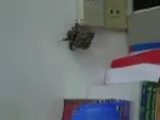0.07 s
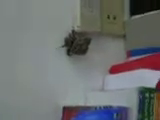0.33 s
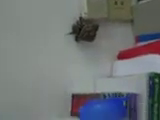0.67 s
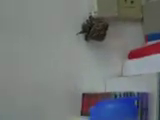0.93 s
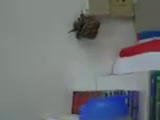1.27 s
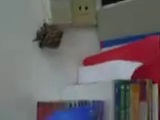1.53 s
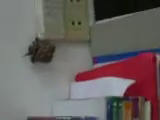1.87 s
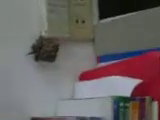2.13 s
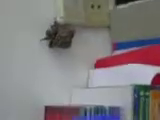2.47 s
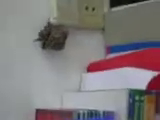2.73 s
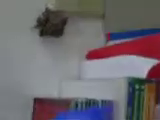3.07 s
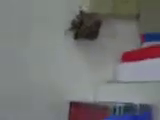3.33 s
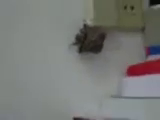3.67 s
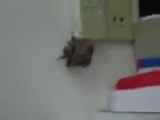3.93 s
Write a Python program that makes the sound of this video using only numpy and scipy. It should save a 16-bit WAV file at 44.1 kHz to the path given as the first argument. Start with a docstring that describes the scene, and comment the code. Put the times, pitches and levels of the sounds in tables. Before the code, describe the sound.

Faint, dry scratches and ticks from a small crab's legs on a wall come in quick bursts over a steady room hum. Soft rubbing and hollow knocks join in; one sharp knock overloads the dull microphone, then the scratching stops.

```python
"""A quiet room hums throughout. Almost at once small, dry, scratchy bursts begin, each a fine rasp with
two or three ticks, perhaps a small camera's focus motor. Soft rubbing and a few hollow knocks,
probably a hand on the camera body, join in. From 1 s the bursts come about seven times a second.
Just after 3 s one knock overloads the dull microphone; the bursts stop and faint rubbing follows."""
import sys
import numpy as np
from scipy import signal
from scipy.fft import rfft, irfft
from scipy.io import wavfile

SR = 44100
rng = np.random.default_rng(int(sys.argv[2]) if len(sys.argv) > 2 else 0)


def unload_audio(sound):
    """Save the sound as a 16-bit wav file, at the path given as the first command line argument."""
    columns = np.transpose(np.atleast_2d(sound))
    # keep every value between -1 and 1, then stretch to whole-number steps
    steps = np.round(np.clip(columns, -1, 1) * 32767)
    wavfile.write(sys.argv[1], SR, steps.astype(np.int16))


N = 176400


def amp(db):
    """Amplitude ratio of a level in decibels."""
    return 10 ** (np.asarray(db) / 20)


def unit(x):
    """Normalisation to rms 1."""
    return x / np.sqrt(np.mean(x ** 2) + 1e-20)


def add(mix, start_s, sound):
    """Superposition: a sound adds to the mix from its onset."""
    part = mix[max(round(start_s * SR), 0):][:len(sound)]
    part += sound[:len(part)]


def colour(x, spectrum):
    """Spectral shaping by a curve of (f/Hz, level/dB) points, at rms 1."""
    hz, db = np.transpose(spectrum)
    f = np.fft.rfftfreq(N, 1 / SR)
    gain = amp(np.interp(np.log(f + 1), np.log(hz + 1), db))
    return unit(irfft(rfft(x) * gain, N))


def ring(modes, rise_s, swell=2):
    """Free vibration: damped modes (f/Hz, level/dB, T60/s) sum under a soft onset."""
    t = np.arange(SR // 10) / SR
    body = sum(amp(db - 60 * t / t60) * np.sin(2 * np.pi * hz * t) for hz, db, t60 in modes)
    return body * (1 - np.exp(-(t / rise_s) ** swell))


def grain_noise(spans, spectrum, edge_s, grains_per_s):
    """Shot noise: tiny random impulses merge into a hiss while a span lasts."""
    t = np.arange(N) / SR
    grains = rng.standard_normal(N) * (rng.random(N) < grains_per_s / SR)
    envelope = np.zeros(N)
    for start, length, db in spans:
        inside_s = np.minimum(t - start, start + length - t)
        envelope += amp(db) * np.clip(inside_s / edge_s + .5, 0, 1)
    return envelope * colour(grains, spectrum)


def low_pass(x, hz):
    """Band limiting by a steep linear-phase filter."""
    return signal.fftconvolve(x, signal.firwin(401, hz, window=("kaiser", 9), fs=SR), "same")


# Spectral density of the room noise: f/Hz, relative level/dB
ROOM_SPECTRUM = [(20, -2.5), (60, -1.5), (90, -7.5), (130, -1.5), (200, -.5), (380, -3), (500, -1),
                 (700, -4.5), (1000, -7.5), (1300, -12.5), (2000, -13.5), (3000, -14.5), (3700, -20.5),
                 (4000, -29.5), (4300, -35)]
def room_noise():
    """Stationary Gaussian noise, strongest at low frequencies."""
    return amp(-41) * colour(rng.standard_normal(N), ROOM_SPECTRUM)


# Tones of the hum: f/Hz, rms level/dB
HUM_TONES = [(100, -66), (161, -68), (269.2, -56.5)]
def hum(depth=0.18, waver_hz=2):
    """Amplitude modulation by slow noise makes each steady tone waver."""
    t, f = np.arange(N) / SR, np.fft.rfftfreq(N, 1 / SR)
    slow_band = np.exp(-(f / waver_hz) ** 2)
    out = np.zeros(N)
    for hz, db in HUM_TONES:
        waver = unit(irfft(rfft(rng.standard_normal(N)) * slow_band, N))
        tone = np.sqrt(2) * np.sin(2 * np.pi * (hz * t + rng.random()))
        out += amp(db) * (1 + depth * waver) * tone
    return out


# Rubbing strokes: t/s, duration/s, level/dB
RUB_STROKES = [(.605, 0.184, -43), (.8, 0.17, -43), (3.31, 0.47, -48.5)]
# Spectrum of the rubbing: f/Hz, relative level/dB
RUB_SPECTRUM = [(80, -22), (180, -8.5), (350, -4.5), (600, -3), (900, 2.5), (1250, 0), (1700, 0),
                (2500, -6.5), (3400, -12), (4400, -32)]
def rubbing():
    """Sliding friction: dense tiny slips in long, gentle strokes give a soft mid-range noise."""
    return grain_noise(RUB_STROKES, RUB_SPECTRUM, edge_s=0.013, grains_per_s=3100)


# Blows on the case: t/s, level/dB, T60 factor, rise time/s, frequency factor
CASE_BLOWS = [(.1205, -31, 1.9, .0005, 1.26), (.8355, -26.5, 0.76, 0.00032, 0.95),
              (.9012, -20, 0.43, 0.00034, 1.87), (1.7185, -28.5, 0.95, .0003, 1.18),
              (2.0095, -24, 1.8, .002, .97), (2.2072, -18, 1.38, 0.00043, 1.07),
              (2.5838, -8, 0.13, .0006, 0.83), (2.857, -28.5, 1.3, 0.0007, 1.59),
              (2.9163, -26, 0.96, .0006, 1.53), (3.1395, -2.5, 0.9, .00033, 1.02),
              (3.3405, -25.5, 0.18, .0003, 1.03)]
# Modes of the case: f/Hz, relative level/dB, T60/s
CASE_MODES = [(377, -31.5, 0.098), (639, -2, 0.028), (766, -7, 0.027), (874, -6, 0.022),
              (1524, 11.5, 0.0025), (2550, -22.5, 0.01), (3750, -21.5, 0.0046)]
def knocks(rebound_s=.0073, rebound_db=-23):
    """Impact excitation: a damped hollow case rings, its pitch set by the spot, and one close echo follows."""
    out = np.zeros(N)
    for start, db, length, rise_s, pitch in CASE_BLOWS:
        modes = [(hz * pitch, level, t60 * length) for hz, level, t60 in CASE_MODES]
        blow = amp(db) * ring(modes, rise_s)
        add(out, start, blow)
        add(out, start + rebound_s, amp(rebound_db) * blow)
    return out


# Bursts of rasp: t/s, duration/s, level/dB
RASP_BURSTS = [(.113, 0.043, -45.5), (.251, 0.028, -44.5), (.45, 0.0038, -42.5), (1.055, 0.026, -46),
               (1.173, 0.044, -49), (1.314, .038, -49.5), (1.452, 0.017, -42), (1.578, 0.033, -44.5),
               (1.715, 0.035, -45), (1.852, 0.043, -44), (1.973, 0.057, -47.5), (2.114, 0.034, -46),
               (2.252, 0.024, -46), (2.315, 0.048, -49.5), (2.4, 0.023, -43.5), (2.45, .038, -44.5),
               (2.715, 0.034, -41), (2.772, 0.042, -45.5), (2.852, 0.016, -47.5), (2.913, .01, -58),
               (2.973, 0.0068, -42), (3.174, 0.012, -43), (3.335, 0.029, -43)]
# Spectrum of the rasp: f/Hz, relative level/dB
RASP_SPECTRUM = [(300, -31), (700, -2), (1000, -6), (1250, -7), (1700, -1.5), (2100, -16.5), (2300, -1.5),
                 (2720, -4), (2920, 1), (3120, -5), (3350, -3.5), (3750, -18.5), (4300, -25.5)]
def fine_rasp():
    """Gated shot noise: short bursts of fine, dry rasp under the ticks."""
    return grain_noise(RASP_BURSTS, RASP_SPECTRUM, edge_s=0.00085, grains_per_s=7000)


# Dry ticks: t/s, relative level/dB, f/Hz
TICKS = [(0.1146, -43, 1800), (0.1486, -32, 1740), (0.2518, -30, 1810), (0.2629, -36.5, 1720),
         (0.2848, -30, 1740), (0.835, -35, 1640), (0.9006, -41, 1580), (1.0571, -25, 1630),
         (1.076, -33, 1720), (1.0809, -27, 1820), (1.1762, -31, 1770), (1.208, -37, 1670),
         (1.3154, -22.5, 1616), (1.3354, -33, 1720), (1.3498, -30, 1690), (1.4538, -34, 1500),
         (1.484, -30, 1750), (1.584, -28, 1734), (1.5957, -30.5, 1670), (1.6132, -33, 1750),
         (1.717, -26, 1710), (1.749, -30.5, 1720), (1.8577, -28.5, 1780), (1.8684, -33, 1630),
         (1.8844, -28, 1660), (1.9748, -26, 1760), (2.1156, -21.5, 1645), (2.149, -28.5, 1780),
         (2.2527, -30.5, 1660), (2.2853, -32, 1824), (2.314, -33.5, 1670), (2.3493, -29, 1740),
         (2.408, -29.5, 1660), (2.4197, -33, 1700), (2.4523, -37, 1700), (2.4835, -27.5, 1740),
         (2.6505, -30.5, 1780), (2.7208, -27, 1640), (2.7366, -27.5, 1690), (2.7531, -29, 1730),
         (2.7736, -36, 1770), (2.7933, -28.5, 1680), (2.808, -32, 1680), (2.859, -31.5, 1660),
         (2.9171, -29.5, 1695), (2.9749, -30.5, 1750), (2.9797, -32.5, 1720), (3.1752, -29, 1730),
         (3.2078, -34, 1760), (3.314, -31, 1630), (3.3514, -29, 1780)]
# Modes of a tick: frequency ratio, relative level/dB, T60/s
TICK_MODES = [(.4, -19.5, .008), (.6, -14, 0.011), (.85, -13, .004), (1, 2.5, 0.0064), (1.3, -13.5, .004),
              (1.7, -14.5, 0.0071), (1.95, -18, 0.006)]
def dry_ticks(gain_db=18, detune=0.02, echo_s=.0029, echo_db=-8.5):
    """Damped resonance: small ticks in quick, regular groups each ring briefly, with one close echo."""
    out = np.zeros(N)
    for start, db, hz in TICKS:
        pitches = hz * (1 + detune * rng.standard_normal(len(TICK_MODES)))
        modes = [(pitch * ratio, level, t60) for pitch, (ratio, level, t60) in zip(pitches, TICK_MODES)]
        tick = amp(db + gain_db) * ring(modes, rise_s=0.0017, swell=3)
        add(out, start, tick)
        add(out, start + echo_s, amp(echo_db) * tick)
    return out


def scene():
    """Superposition of close, dry sources over the room's background."""
    return (room_noise() + hum() + rubbing() + knocks() + fine_rasp() + dry_ticks())[None]


def record(dry, bass_hz=119, treble_hz=4250, overload=0.68, distortion_hz=11100):
    """Saturation: the loudest knock clips a narrow-band microphone, adding a little treble distortion."""
    thin = signal.sosfilt(signal.butter(2, bass_hz, "high", fs=SR, output="sos"), dry[0])
    clipped = np.clip(low_pass(thin, treble_hz), -overload, overload)
    softened = signal.sosfilt(signal.butter(1, distortion_hz, fs=SR, output="sos"), clipped)
    return low_pass(softened, hz=16000)[None]


dry = scene()
out = record(dry)
unload_audio(out)
```